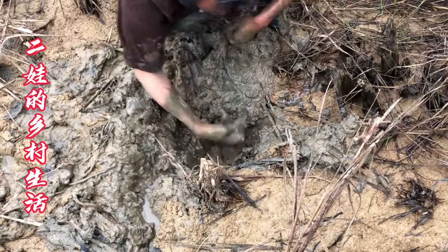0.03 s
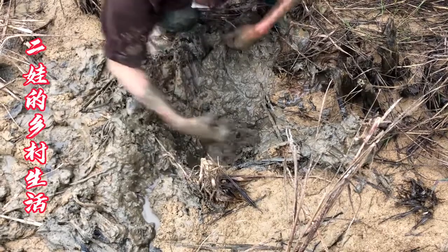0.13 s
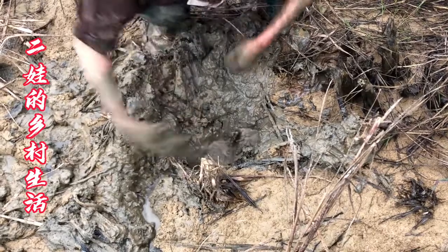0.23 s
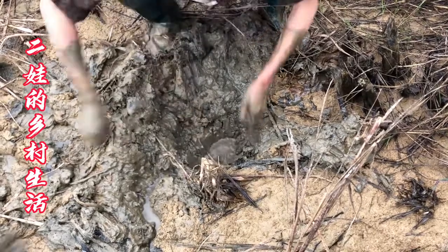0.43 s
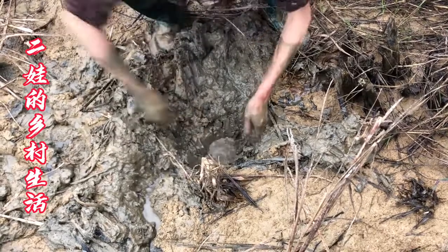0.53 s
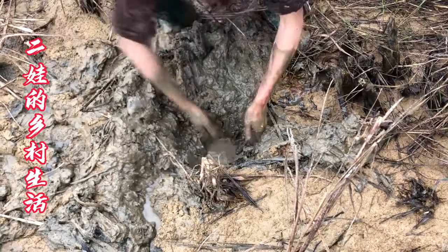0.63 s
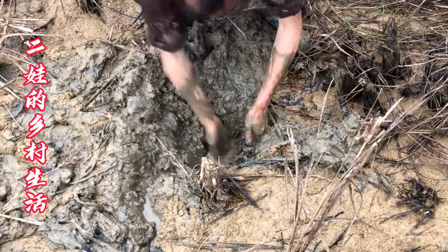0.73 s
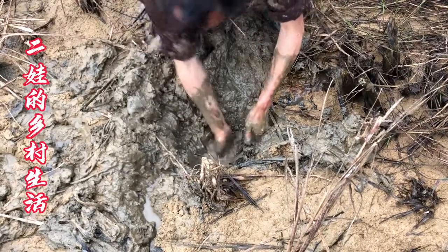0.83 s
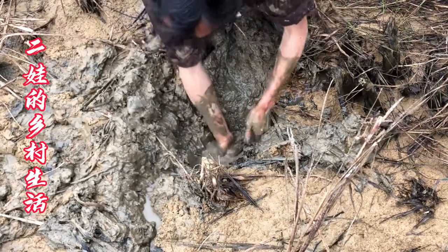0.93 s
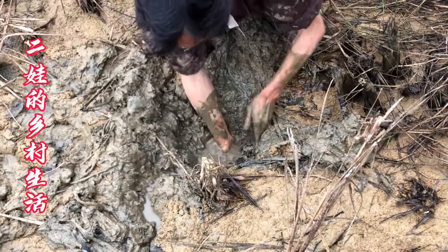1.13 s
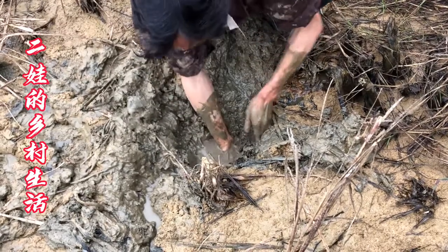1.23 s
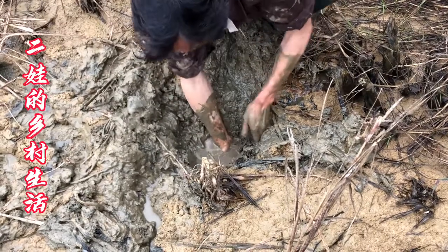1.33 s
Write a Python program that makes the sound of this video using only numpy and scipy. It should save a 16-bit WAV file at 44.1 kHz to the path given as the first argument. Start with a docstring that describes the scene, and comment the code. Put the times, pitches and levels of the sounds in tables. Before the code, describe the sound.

Hands squeeze wet mud with small sticky snaps and pops, heard up close in a quiet field. A soft wet thud comes first, then a short slick hiss and a sucking pop, with faint low outdoor noise beneath.

```python
"""Bare hands slap, dig and squeeze wet mud in an open field, close to the microphone.
Wet films snap and air pockets pop, thickest as a clod lands with a soft thud near 0.37 s.
A hand slides over slick mud at 0.82 s, then a suction hole bursts open just before 1 s.
Throughout, smeared mud crackles and hisses over a faint outdoor rumble."""
import sys
import numpy as np
from scipy import signal
from scipy.fft import rfft, irfft
from scipy.io import wavfile

SR = 44100
rng = np.random.default_rng(int(sys.argv[2]) if len(sys.argv) > 2 else 0)


def master_out(mix):
    """Clip the mix to full scale and print it as 16-bit PCM to the path in sys.argv[1]."""
    frames = np.transpose(np.atleast_2d(mix))
    ceiling = np.clip(frames, -1, 1)
    pcm = np.round(ceiling * 32767).astype(np.int16)
    wavfile.write(sys.argv[1], SR, pcm)


N = 61739
T = np.arange(N) / SR


def amp(db):
    """Decibels to gain."""
    return 10 ** (np.asarray(db) / 20)


def unit(x):
    """Scale to rms 1."""
    return x / np.sqrt(np.mean(x ** 2) + 1e-20)


def add(mix, start_s, sound):
    """Mix a sound in at start_s."""
    part = mix[max(round(start_s * SR), 0):][:len(sound)]
    part += sound[:len(part)]


def colour(x, spectrum):
    """Shape by (freq_hz, gain_db) points, at rms 1."""
    freq_hz, gain_db = np.transpose(spectrum)
    bin_hz = np.fft.rfftfreq(N, 1 / SR)
    gain = amp(np.interp(np.log(bin_hz + 1), np.log(freq_hz), gain_db))
    return unit(irfft(rfft(x) * gain, N))


def band(x, cutoff_hz, kind, order=2):
    """Butterworth low-pass or high-pass."""
    return signal.sosfilt(signal.butter(order, cutoff_hz, kind, fs=SR, output="sos"), x)


def ring(pitch_hz, swell_s):
    """Tone on a pitch curve: peaks at swell_s, then dies."""
    age = T[:len(pitch_hz)] / swell_s
    envelope = (age * np.exp(1 - age)) ** 1.348
    return envelope * np.sin(2 * np.pi * np.cumsum(pitch_hz) / SR)


# freq_hz, gain_db
SNAP_SPECTRUM = [(180, -35.5), (300, 1.5), (781, 1), (1120, -40), (1260, -25), (1440, -5), (2610, 0),
                 (3630, -11.5), (4070, -5.5), (5570, -7), (7020, -5), (11900, -10), (15500, -4.5)]
# start_s, level_db, decay_s, highpass_hz
FILM_SNAPS = [(0.0402, -33.5, 0.00356, 6050), (0.0568, -49, 0.0036, 7880), (0.1271, -37, 0.00128, 8100),
              (0.1848, -35.5, 0.0056, 5000), (0.195, -36.5, 0.0063, 2390), (0.206, -39, 0.0059, 3000),
              (0.2208, -26, 0.00266, 2610), (0.2335, -30.5, 0.00328, 2210), (0.294, -31, 0.00119, 5000),
              (0.3398, -29, 0.00222, 3000), (0.3476, -30, 0.0017, 500), (0.3505, -25, 0.00113, 400),
              (0.3598, -22.5, 0.00574, 2500), (0.3665, -21.5, 0.00452, 1450), (0.3687, -27.5, 0.00198, 500),
              (0.3864, -10.5, 0.001343, 2010), (0.391, -27.5, 0.0021, 1800), (.4388, -37.5, 0.00247, 695),
              (0.5578, -33, 0.00295, 5030), (0.6183, -39.5, 0.0025, 7000), (.647, -52.5, 0.0026, 5000),
              (0.6647, -33.5, 0.0043, 1500), (0.674, -28.5, 0.00385, 3100), (0.6815, -29, 0.0036, 5000),
              (.6868, -27.5, 0.00366, 1110), (.7368, -39.5, 0.00186, 3500), (0.946, -30, 0.00091, 4030),
              (.9863, -34, 0.0035, 10900), (1.2598, -47.5, 0.0045, 8100)]

def film_snaps():
    """Wet films snap: sharp sprays of wide noise that die in milliseconds."""
    out, t = np.zeros(N), T[:SR // 20]
    for start_s, level_db, decay_s, highpass_hz in FILM_SNAPS:
        spray = band(colour(rng.standard_normal(N), SNAP_SPECTRUM), highpass_hz, "high")
        rise_s = 0.1085 * decay_s
        envelope = np.minimum(t / rise_s, 1) * np.exp(-t / decay_s)
        add(out, start_s, amp(level_db) * unit(spray[-len(t):]) * envelope)
    return out


# start_s, level_db, pitch_hz, swell_s
AIR_POPS = [(0, -43.5, 2916, 0.00263), (0.0243, -43.5, 1754, 0.00153), (0.0252, -39, 6760, 0.00138),
            (0.046, -38, 8610, 0.00132), (.0775, -44.5, 6860, 0.00103), (.105, -43, 2890, 0.00055),
            (.1155, -43.5, 4360, 0.00077), (.1975, -37, 2506, 0.00213), (.208, -36, 4330, 0.0012),
            (0.218, -42.5, 2532, 0.00113), (.234, -40, 2226, 0.00169), (0.3061, -47.5, 2850, 0.00091),
            (.3538, -28, 3040, 0.00082), (.361, -29.5, 4700, 0.00103), (0.3811, -34, 3060, 0.00094),
            (0.3847, -24, 5182, 0.001065), (.3861, -35.5, 2620, 0.00055), (.3937, -31, 3132, 0.00073),
            (0.393, -34.5, 1532, 0.00136), (0.5118, -40, 2550, 0.00178), (0.557, -36.5, 9560, 0.00133),
            (.607, -42, 4686, 0.00087), (0.6233, -41, 2167, 0.00121), (0.6405, -35.5, 6327, 0.00161),
            (0.664, -33.5, 3700, 0.00103), (0.6863, -38, 1264, 0.0034), (0.723, -40.5, 2370, 0.00055),
            (.7372, -37.5, 4364, 0.00158), (0.7818, -41, 6590, 0.00053), (.851, -54, 2590, 0.00094),
            (.862, -44, 1558, 0.00072), (0.9159, -32.5, 1776, 0.001385), (0.9586, -49.5, 2690, 0.00155),
            (1.096, -53, 5340, 0.00194), (1.2095, -50.5, 6360, 0.00259), (1.321, -47, 3036, 0.00143),
            (1.345, -45.5, 1980, 0.00076)]

def air_pops():
    """Air pockets ring briefly, rising a little in pitch as they open."""
    out, t = np.zeros(N), T[:SR // 20]
    for start_s, level_db, pitch_hz, swell_s in AIR_POPS:
        flutter = 1 + 0.365 * unit(band(rng.standard_normal(len(t)), cutoff_hz=502, kind="low"))
        glide_hz = pitch_hz * (1 + 0.0927 * np.tanh((t / swell_s - 1) / 2))
        add(out, start_s, amp(level_db) * ring(glide_hz, swell_s) * flutter)
    return out


# start_s, level_db, final_pitch_hz, swell_s
LUMP_THUDS = [(.349, -42.5, 563, 0.0016), (.3692, -22.5, 608.5, 0.000634), (0.3897, -24.5, 285, 0.001008),
              (.396, -31, 466, 0.001005), (.758, -40.5, 344, 0.00303), (.779, -44.5, 383.6, 0.00447),
              (.9945, -41.5, 379, 0.00125)]

def lump_thuds():
    """Soft lumps land; the pitch drops as each flattens."""
    drop_s = 0.000673
    out, t = np.zeros(N), T[:SR // 20]
    for start_s, level_db, final_pitch_hz, swell_s in LUMP_THUDS:
        glide_hz = final_pitch_hz * (1 + 2.373 * np.exp(-t / drop_s))
        add(out, start_s, amp(level_db) * ring(glide_hz, swell_s))
    return out


# freq_hz, level_db, t60_s
HOLE_MODES = [(1996, -4.5, 0.00484), (2244, -2.5, 0.0056), (2945, 4, 0.00474), (3538, -2, 0.00314),
              (4491, -3, 0.0078), (5000, -19, 0.00286)]
# start_s, level_db, length_s
SEAL_TEARS = [(0.9863, -18, 0.00164), (0.9879, -18, 0.00263), (.9909, -26, 0.00314), (.9955, -31, 0.00106),
              (1.002, -45, .0018), (1.0084, -34.5, 0.00177)]

def suction():
    """The seal around a hand tears in quick slips that ring the hole beneath."""
    slip_period_s, highpass_hz, lowpass_hz = 1 / 1004.2, 1210, 5306
    drive, t = np.zeros(N), T[:SR // 20]
    for start_s, level_db, length_s in SEAL_TEARS:
        jitter, hiss = rng.standard_normal((2, len(t)))
        for k, slip_s in enumerate(np.arange(0, length_s, slip_period_s)):
            add(drive, start_s + slip_s + 0.09 * slip_period_s * jitter[k], amp([level_db]))
        add(drive, start_s, 0.166 * amp(level_db) * hiss * np.exp(-t / length_s))
    hole = sum(amp(db - 60 * t / t60_s) * np.cos(2 * np.pi * hz * t) for hz, db, t60_s in HOLE_MODES)
    hole = band(hole, highpass_hz, "high", order=1)
    hole = band(hole, lowpass_hz, "low", order=4)
    return signal.fftconvolve(drive, hole / abs(hole).max())[:N]


def crackle():
    """Tiny bubbles of many sizes over the hiss of sliding mud."""
    bubbles_per_s, pitch_count, spread_db, swell_cycles = 1500, 36, 5, 1.95
    bubbles = np.zeros(N)
    for pitch_hz in np.geomspace(900, 15000, pitch_count):
        strength = amp(spread_db * np.minimum(rng.exponential(1, N), 2.8))
        onsets = rng.random(N) < bubbles_per_s / pitch_count / SR
        bubble = ring(np.full(SR // 40, pitch_hz), swell_cycles / pitch_hz) * pitch_hz
        bubbles += signal.oaconvolve(strength * onsets, bubble)[:N]
    return amp(-3) * unit(bubbles) + amp(-3.5) * rng.standard_normal(N)


# freq_hz, gain_db
MID_SPECTRUM = [(200, 5), (400, 9), (800, -2), (1400, -3), (2400, 0.5), (3300, -4), (4500, -3), (6500, -9),
                (16000, -41)]
TREBLE_SPECTRUM = [(200, -45.5), (3000, -31), (5000, -5), (7000, -2), (9000, 2), (11500, 0), (14000, 2),
                   (16000, 1)]
# time_s, mid_db, treble_db
SMEAR_LEVELS = [(0, -57, -58), (0.091, -55, -54.5), (0.149, -60.5, -61), (.175, -59, -53),
                (0.206, -55.5, -50.5), (0.239, -53.5, -49), (.255, -53.5, -58.5), (.283, -61, -59.5),
                (.305, -46.5, -48.5), (0.332, -60, -58.5), (0.358, -47.5, -42.5), (0.391, -50, -38.5),
                (.42, -48.5, -54.5), (.53, -53.5, -56.5), (.6, -53.5, -48.5), (.69, -49.5, -52.5),
                (.715, -52, -54), (.76, -50.5, -50), (.79, -53.5, -56), (.835, -58.5, -54.5),
                (0.866, -54, -59.5), (.9, -64, -56.5), (.98, -58, -56.5), (1.01, -53.5, -62.5),
                (1.06, -64, -57), (1.12, -64, -69), (1.191, -64.5, -63), (1.213, -66.5, -61.5),
                (1.235, -61, -64), (1.291, -63.5, -71.5), (1.328, -56.5, -54.5), (1.4, -66, -70.5)]

def smear():
    """Mud crackles and hisses as fingers push through it."""
    time_s, mid_db, treble_db = np.transpose(SMEAR_LEVELS)
    mid = amp(np.interp(T, time_s, mid_db)) * colour(crackle(), MID_SPECTRUM)
    treble = amp(np.interp(T, time_s, treble_db)) * colour(crackle(), TREBLE_SPECTRUM)
    return mid + treble


# freq_hz, gain_db
SLIDE_SPECTRUM = [(200, -43), (5000, -15.5), (7000, -2.5), (8700, 2.5), (11000, -6.5), (13800, 1),
                  (16000, -10.5)]

def hand_slide():
    """One hand slides over slick mud: a short, smooth hiss."""
    peak_s, width_s, level_db = 0.8186, 0.0258, -46.5
    envelope = np.exp(-((T - peak_s) / width_s) ** 2)
    return amp(level_db) * envelope * colour(rng.standard_normal(N), SLIDE_SPECTRUM)


def ground_scatter(mud):
    """Short, weak reflections from the ground and banks."""
    level_db, t60_s, delay_s = -17.5, 0.0473, 0.0052
    t = T[:SR // 4]
    tail = band(rng.standard_normal(len(t)), cutoff_hz=9970, kind="low", order=1)
    tail *= amp(-60 * t / t60_s) * (t > delay_s)
    return amp(level_db) * signal.fftconvolve(mud, tail / np.linalg.norm(tail))[:N]


# freq_hz, gain_db
RUMBLE_SPECTRUM = [(20, -41), (35, -22), (58, -1), (100, -2.5), (150, -2), (260, -7), (420, -13),
                   (600, -14.5), (1000, -21), (3200, -39.5), (15000, -64)]

def field_rumble():
    """Faint, steady low noise of the open field."""
    return amp(-57) * colour(rng.standard_normal(N), RUMBLE_SPECTRUM)


def scene():
    """Mud, its scatter and the field, in mono."""
    mud = film_snaps() + air_pops() + lump_thuds() + suction() + smear() + hand_slide()
    return (mud + ground_scatter(mud) + field_rumble())[None]


def record(dry):
    """Steep low-pass band limit."""
    cutoff_hz = 15550
    lowpass = signal.firwin(401, cutoff_hz, window=("kaiser", 9), fs=SR)
    return signal.oaconvolve(dry, lowpass[None], "same")


dry = scene()
out = record(dry)
master_out(out)
```